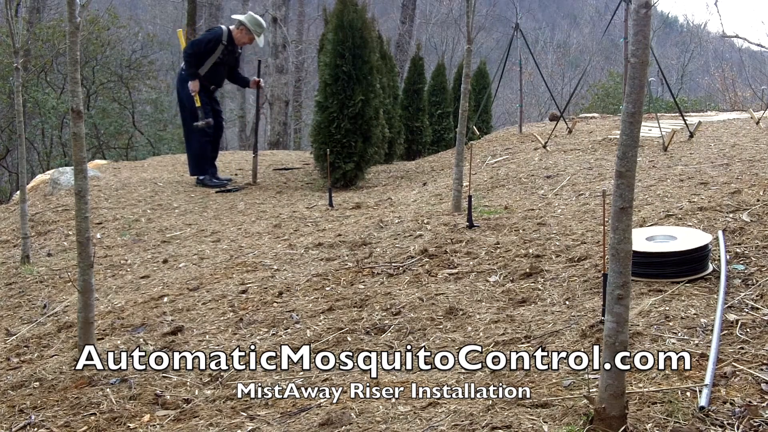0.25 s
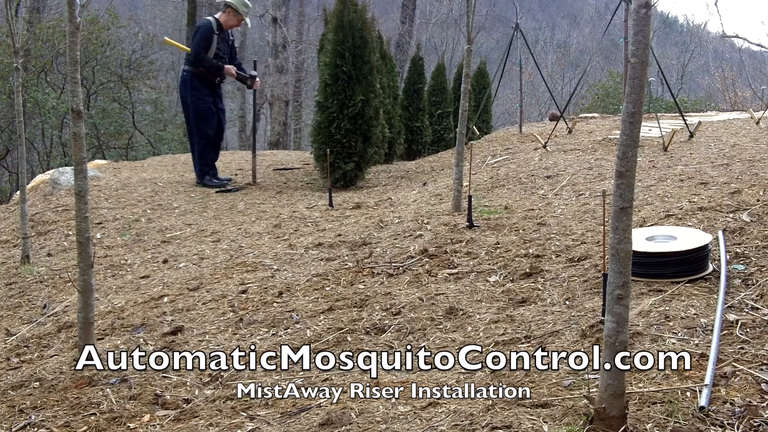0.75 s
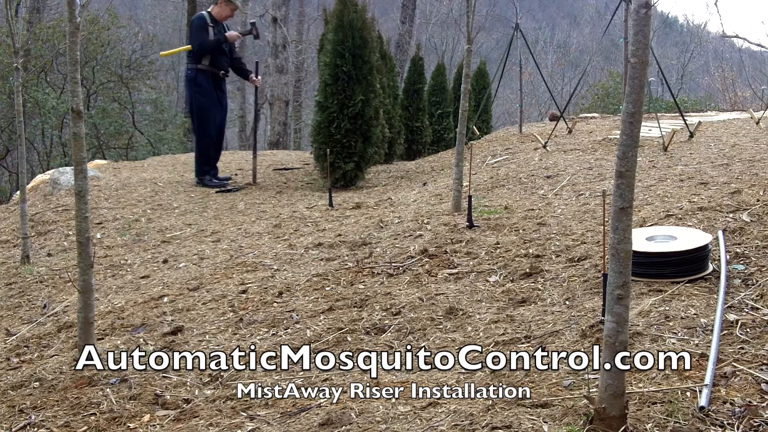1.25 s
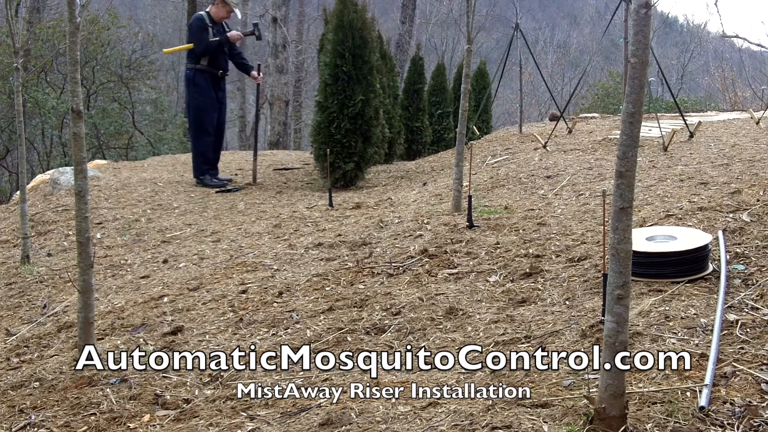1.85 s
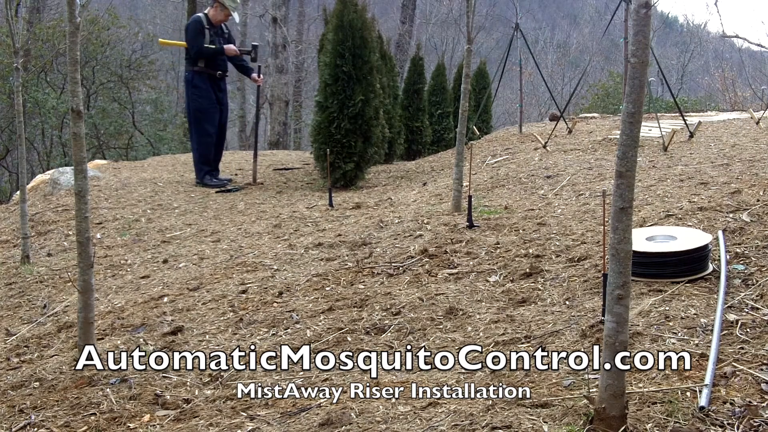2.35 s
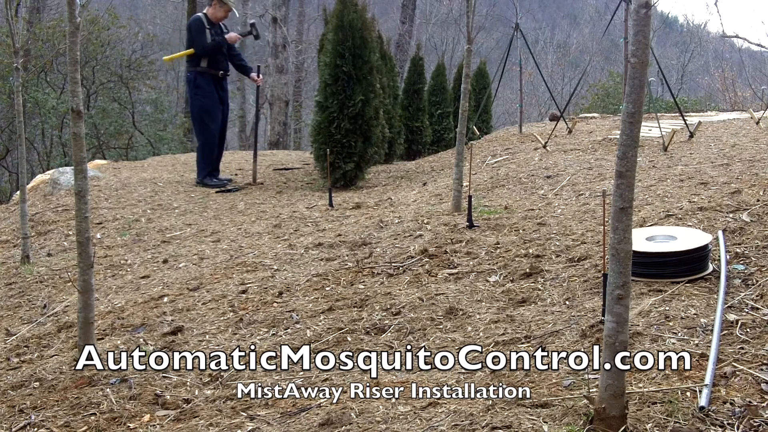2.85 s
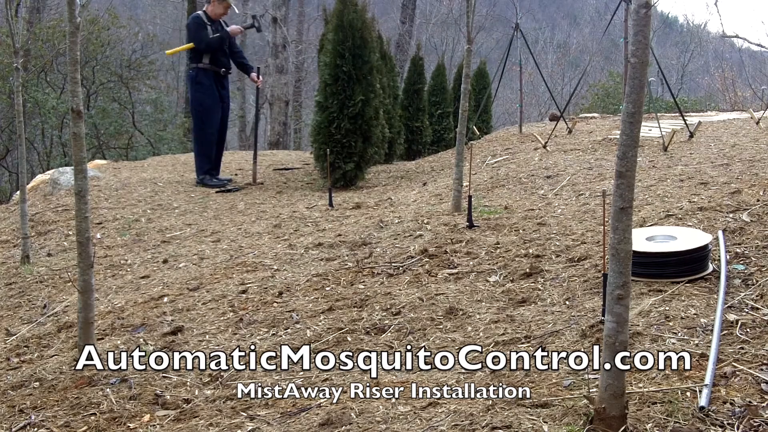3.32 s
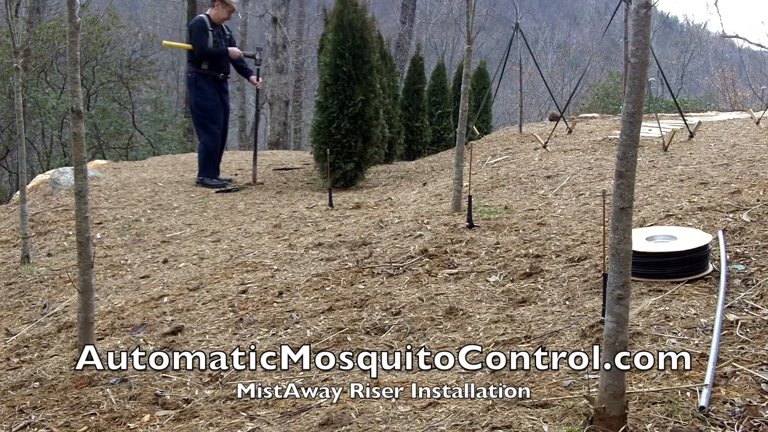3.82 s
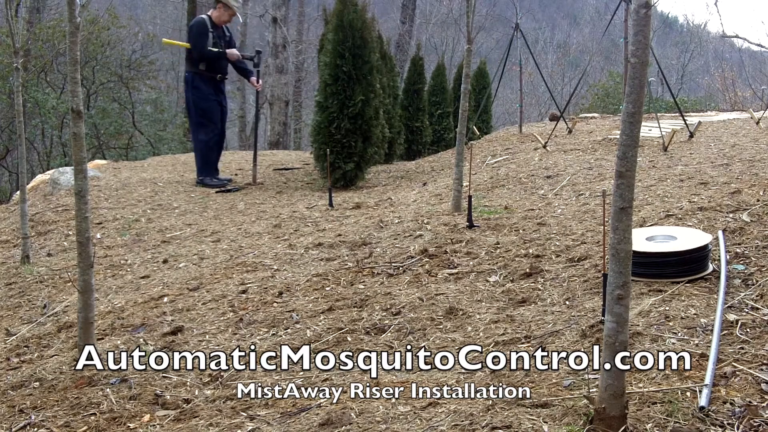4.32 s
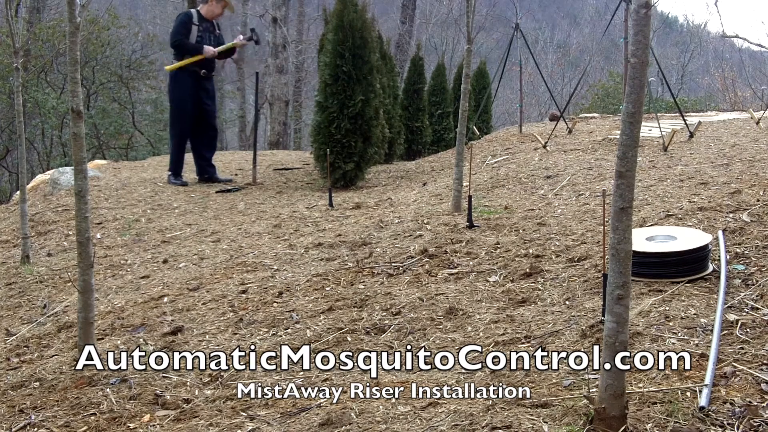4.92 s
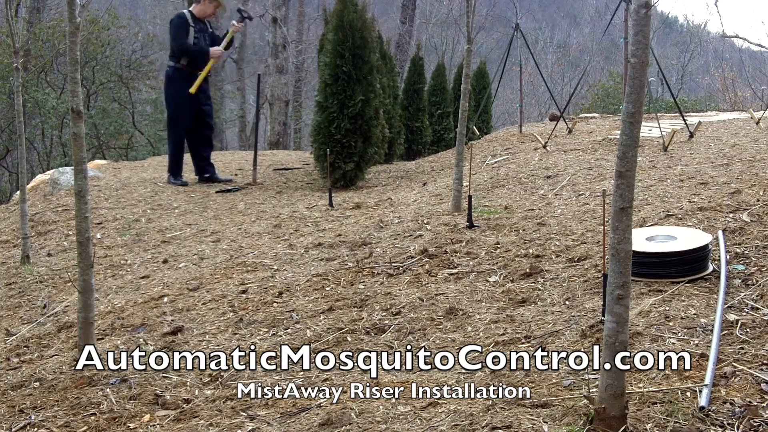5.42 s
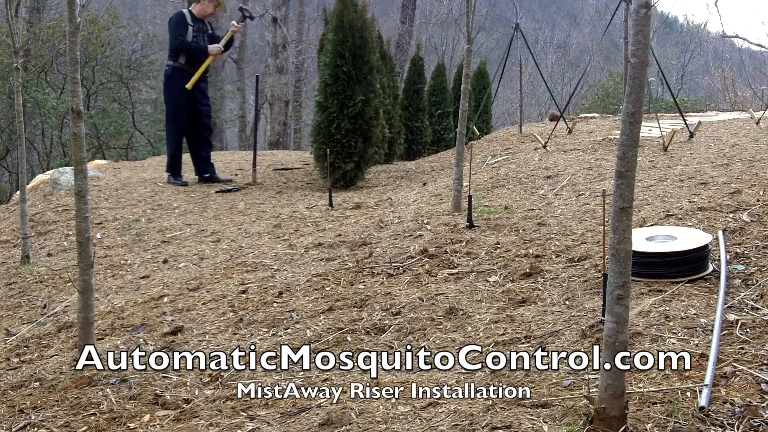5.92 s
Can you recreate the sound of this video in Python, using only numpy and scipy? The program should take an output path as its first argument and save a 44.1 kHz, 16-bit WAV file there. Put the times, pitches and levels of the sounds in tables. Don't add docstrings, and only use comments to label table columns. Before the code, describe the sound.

Outdoors on a wooded hillside, soft wind and faint crows precede four evenly spaced distant sledge blows on a steel stake, each a bright clank with a short ring and an echo from the trees. The scene then cuts abruptly to nearer, drier hammer taps, quick and irregular, with sharp cracks, a high singing hammer head and dull soil thuds. A small bird whistles faintly.

```python
import sys
import numpy as np
from scipy import signal
from scipy.fft import rfft, irfft, next_fast_len
from scipy.io import wavfile
from scipy.ndimage import uniform_filter1d, map_coordinates

SR = 44100
rng = np.random.default_rng(int(sys.argv[2]) if len(sys.argv) > 2 else 0)


def master(y):
    cut = np.clip(np.atleast_2d(y).T, -1, 1)
    pcm = np.round(cut * 32767)
    wavfile.write(sys.argv[1], SR, pcm.astype(np.int16))


def makeup_ratio(level_db):
    decades = np.asarray(level_db, float) / 20
    return 10 ** decades


N = 272097
CHANGE_S = 4.243


def unit(x):
    return x / np.sqrt(np.mean(x ** 2) + 1e-20)


def along(points, hz):
    f, v = np.transpose(points)
    return np.interp(np.log(hz + 1), np.log(f + 1), v)


def curve(rows):
    return np.interp(np.arange(N) / SR, *np.transpose(rows))


def wobble(rate):
    knots = rng.standard_normal(int(N * rate / SR) + 4)
    return map_coordinates(knots, [np.arange(N) * rate / SR])


def filtered(x, response):
    n = x.shape[-1]
    m = next_fast_len(n + 8192)
    return irfft(rfft(x, m) * response(np.fft.rfftfreq(m, 1 / SR)), m)[..., :n]


def rush(spectrum, alike):
    def mid_and_side(hz):
        turn = np.arccos(np.clip(along(alike, hz), -1, 1)) / 2
        colour = makeup_ratio(along(spectrum, hz)) * (hz > spectrum[0][0])
        return colour * [np.cos(turn), np.sin(turn)]

    mid, side = filtered(rng.standard_normal((2, N)), mid_and_side)
    return unit(np.array([mid + side, mid - side]))


def ring(modes, t, scatter_db, gains_db=0):
    hz, db, t60 = np.transpose(modes)[:, :, None]
    level = db + gains_db + scatter_db * rng.standard_normal(hz.shape) - 60 * t / t60
    return np.sum(makeup_ratio(level) * np.sin(2 * np.pi * hz * t), 0)


def causal(spectrum, size=4096):
    hz = np.fft.rfftfreq(size, 1 / SR)
    cepstrum = irfft(np.log(makeup_ratio(along(spectrum, hz))), size)
    cepstrum[1:size // 2] *= 2
    cepstrum[size // 2 + 1:] = 0
    return irfft(np.exp(rfft(cepstrum)), size)[:size // 4]


def burst(spectrum, t, t60, bounces):
    force = rng.standard_normal(len(t)) * makeup_ratio(-60 * t / t60)
    for s, db in bounces:
        force[round(s * SR)] += makeup_ratio(db)
    sound = signal.fftconvolve(force, causal(spectrum))[:len(t)]
    return sound / np.abs(sound).max()


def answer(x, decays, echoes, rise):
    hz, t, z = signal.stft(rng.standard_normal(len(x)), SR, nperseg=256)
    fading = z * makeup_ratio(-60 * t / along(decays, hz)[:, None])
    tail = signal.istft(fading, SR, nperseg=256)[1][:len(x)]
    age = np.arange(len(x)) / SR
    tail = tail * (1 - np.exp(-age / rise))
    tail = tail / np.linalg.norm(tail)
    for s, smear, top_hz, db in echoes:
        clump = rng.standard_normal(len(x)) * np.exp(-((age - s) / smear) ** 2)
        clump = makeup_ratio(db) * clump / np.linalg.norm(clump)
        tail = tail + filtered(clump, lambda f: 1 / (1 + (f / top_hz) ** 2))
    return signal.fftconvolve(x, tail)[:len(x)]


def housing(x):
    return filtered(x, lambda hz: makeup_ratio(-10.5 * np.exp(-((hz - 4250) / 330) ** 2)))


# start in seconds, level in dB, sharpness in dB, grip of the soil in dB.
SLEDGE_BLOWS = [
    (1.746, -20.5, -3, -2.5),
    (2.3992, -19, 2, -3.5),
    (3.106, -19.5, 2, -0.5),
    (3.9381, -19.5, 5.5, 1),
]
STAKE_PITCHES = [130, 330, 672, 1070, 1530, 2095, 2294, 2770, 3450, 4925, 5181, 5700, 6100, 6270, 6580,
                 6960, 7080, 7277, 8000, 9421, 10250, 11965, 13890]
# level in dB, t60 in seconds, level sent sideways into the trees in dB.
STAKE_MODES = [(-22.5, 0.096, -13), (-26.5, 0.075, -7), (-21, 0.05, 5.5), (-10, 0.041, -1.5),
               (-18, 0.066, 4.5), (-8, 0.078, -6.5), (0, 0.12, -10.5), (-12.5, 0.059, -3.5),
               (-10, 0.031, -0.5), (-14, 0.19, -9), (-39, 0.15, -1.5), (-29, 0.075, -3.5),
               (-9.5, 0.055, 2.5), (-30.5, .06, -7), (-30.5, 0.047, -6.5), (-20.5, 0.14, 2.5),
               (-13, 0.097, -1), (-6, 0.073, -10), (-17.5, 0.1, 1), (-9.5, 0.043, -2), (-19, 0.024, 3),
               (-22, 0.043, -5), (-29.5, .07, -5.5)]
# frequency in Hz, level in dB.
CLANK_COLOUR = [(300, -16.5), (520, -17.5), (700, -3.5), (1100, 5), (1800, -4.5), (3000, -1.5),
                (4250, -14.5), (6500, 5.5), (10000, -15.5), (15500, -46)]
# frequency in Hz, t60 in seconds.
WOODS_DECAY = [(300, 0.54), (1000, 1), (2500, 1.0), (5000, 0.82), (9000, 0.28), (14000, 0.3)]


def blows():
    out, t = np.zeros(N + 2 * SR), np.arange(SR) / SR
    pitch = np.array(STAKE_PITCHES)[:, None]
    level, t60, sent_db = np.transpose(STAKE_MODES)
    modes = np.column_stack([pitch, level, t60])
    freed_modes = modes * [1.003, 1, 5]
    onset = 1 - np.exp(-t / 0.00047)

    def beam(hz):
        return makeup_ratio(-5) / (1 + 1j * hz / 4500) ** 2

    for s, db, sharp_db, grip_db in SLEDGE_BLOWS:
        five_db = -3 - grip_db
        seven_db = 0.87 * sharp_db
        gains_db = along([(2100, grip_db), (2290, 0), (2800, 0), (4900, five_db),
                          (6000, seven_db), (7300, seven_db), (9400, sharp_db)], pitch)
        sideways_db = gains_db + sent_db[:, None]
        clank = burst(CLANK_COLOUR, t, t60=0.051, bounces=[(.0003, 14.2), (.004, 4.6)])
        clank = makeup_ratio(grip_db + 5.5) * clank
        direct = onset * ring(modes, t, scatter_db=1, gains_db=gains_db) + clank
        after = ring(freed_modes, t, scatter_db=2, gains_db=sideways_db - 12 * (pitch < 1800))
        sideways = onset * ring(modes, t, scatter_db=1, gains_db=sideways_db) + filtered(clank, beam)
        trees = housing(answer(sideways, WOODS_DECAY, [(.046, 0.0075, 2580, 4.4)], rise=0.0032))
        blow = direct + makeup_ratio(-24 - grip_db) * after + makeup_ratio(-8.0) * trees
        out[round(s * SR):][:len(t)] += makeup_ratio(db) * blow
    return out[:N]


# start in seconds, peak in dB, hardness in dB, rebound in dB.
HAMMER_TAPS = [
    (4.191, -19, -3, -14),
    (4.3719, -15.5, -1.5, -10),
    (4.5696, -15, 0.5, -11.5),
    (4.9424, -16, 0, -32),
    (5.1009, -14.5, 2.5, -15),
    (5.269, -14, 5.5, -31),
    (5.595, -13, 8, -26),
    (5.869, -13.5, 6.5, -19),
    (6.088, -13, 11.5, -17),
]
# start in seconds, peak in dB.
FACE_GRAZES = [
    (5.0765, -43),
    (5.2533, -43),
    (5.5823, -43),
    (6.0812, -41.5),
]
HEAD_PITCHES = [9221, 9160, 9240, 14000]
# level in dB, t60 in seconds.
HEAD_MODES = [(1, 0.0087), (-0.5, 0.024), (-35, 0.47), (-37, 0.04)]
FACE_PITCHES = [4225, 4330]
# level in dB, t60 in seconds.
FACE_MODES = [(-30.5, 0.067), (-41.5, 0.085)]
# frequency in Hz, level in dB, t60 in seconds.
SOIL_MODES = [(183.4, -27.5, 0.25), (211.4, -9.5, 0.058), (349, -8, 0.018), (494, -12.5, 0.015)]
# frequency in Hz, level in dB.
CRACK_COLOUR = [(300, -34), (1000, -3.5), (1900, -10.5), (2600, 4.5), (4600, 10), (5700, 8), (7000, -5),
                (10500, 0), (13000, 4.5), (16500, -17.5)]
# frequency in Hz, t60 in seconds.
BANK_DECAY = [(200, 0.42), (2000, 0.27), (5000, 0.26), (9000, 0.23), (14000, 0.15)]


def taps():
    out, t = np.zeros(N + SR), np.arange(SR // 2) / SR
    late = np.clip(t - .0012, 0, 1)
    head_modes = np.column_stack([HEAD_PITCHES, HEAD_MODES])
    face_modes = np.column_stack([FACE_PITCHES, FACE_MODES])
    thud_db, head_level_db = -25, -6.5
    contacts = [(*tap, thud_db, head_level_db) for tap in HAMMER_TAPS]
    contacts += [(*graze, -6.5, -20, thud_db - 23, head_level_db - 7.5) for graze in FACE_GRAZES]
    for s, db, hard_db, rebound_db, soil_db, head_db in contacts:
        head = makeup_ratio(head_db - 0.74 * hard_db) * ring(head_modes, t, scatter_db=1)
        head = head * (1 - np.exp(-t / 0.00013))
        face = makeup_ratio(-2 * hard_db) * ring(face_modes, t, scatter_db=1)
        colour = [(hz, gain + hard_db * (hz < 3000 or hz > 6500)) for hz, gain in CRACK_COLOUR]
        bounces = [(.0001, 13), (.00054, 24), (.0012, 24 + rebound_db)]
        click = burst(colour, t, t60=.007, bounces=bounces)
        deeper_db = 5.5 * (s - CHANGE_S)
        thud = -makeup_ratio(soil_db + deeper_db) * ring(SOIL_MODES, late, scatter_db=1)
        thud = thud * (1 - np.exp(-late / .001))
        bank = answer(click + face + makeup_ratio(-4.0) * head, BANK_DECAY, [(.011, 0.0011, 8960, 0)], rise=0.0013)
        out[round(s * SR):][:len(t)] += makeup_ratio(db) * (click + head + face + makeup_ratio(-11) * bank) + thud
    return out[:N]


# start in seconds, frequency in Hz, level in dB, t60 in seconds.
GROUND_THUMPS = [
    (2.405, 38, -35, 0.18),
    (3.111, 42.4, -39, 0.33),
    (3.942, 49, -37, 0.29),
]


def thumps():
    out, t = np.zeros(N + SR), np.arange(SR // 2) / SR
    for s, hz, db, t60 in GROUND_THUMPS:
        wave = ring([(hz, db, t60)], t, scatter_db=5.5)
        out[round(s * SR):][:len(t)] += wave * (1 - np.exp(-t / 0.012))
    return out[:N] * makeup_ratio([[1.8], [-1.8]])


# start in seconds, length in seconds, start pitch in Hz, end pitch in Hz, level in dB.
CROW_CAWS = [
    (0.096, 0.15, 1420, 1520, -70),
    (0.31, 0.14, 1300, 1344, -71),
    (0.491, 0.19, 1460, 1370, -71),
    (0.681, 0.17, 1260, 1275, -69.5),
    (.74, 0.18, 1470, 1453, -71.5),
    (0.899, 0.273, 1450, 1410, -75),
    (1.398, 0.34, 1420, 1420, -75),
    (1.41, 0.12, 1300, 1345, -71),
]


def crows():
    out = np.zeros(N + SR)
    for s, length, start_hz, end_hz, db in CROW_CAWS:
        u = np.arange(round(length * SR)) / (length * SR)
        hoarse = unit(uniform_filter1d(rng.standard_normal(len(u)), size=500)) + 0.18
        hz = start_hz + (end_hz - start_hz) * u
        caw = hoarse * np.sin(2 * np.pi * np.cumsum(hz) / SR)
        out[round(s * SR):][:len(u)] += makeup_ratio(db) * caw * np.sin(np.pi * u) ** 0.22
    return out[:N]


# start in seconds, top level in dB.
BIRD_NOTES = [
    (4.667, -63),
    (4.748, -66),
    (4.808, -66),
    (5.993, -66),
    (6.022, -69),
    (6.046, -76),
]


def songbird():
    note_s = 0.0245
    out, u = np.zeros(N + SR), np.arange(round(note_s * SR)) / (note_s * SR)
    blur_hz = 60 * wobble(400)
    for s, db in BIRD_NOTES:
        hz = 5000 + 450 * np.sin(np.pi * u) - 350 * u ** 2
        hz = hz + blur_hz[round(s * SR):][:len(u)]
        whistle = np.sin(2 * np.pi * np.cumsum(hz) / SR)
        out[round(s * SR):][:len(u)] += makeup_ratio(db) * whistle * np.sin(np.pi * u)
    return out[:N] * makeup_ratio(2 * wobble(90))


# start in seconds, length in seconds, centre in Hz,
# width in Hz, level in dB.
LEAF_RUSTLES = [
    (0.334, 0.071, 6200, 1200, -70.5),
    (0.465, 0.037, 4840, 330, -77),
    (0.805, 0.024, 5370, 980, -75),
    (0.83, 0.065, 6050, 710, -69.5),
    (1.314, 0.11, 6500, 1500, -75),
    (1.574, 0.086, 7160, 80, -97),
    (4.656, 0.26, 5166, 400, -78),
    (5.022, 0.0089, 11570, 3000, -66),
    (4.216, 0.31, 408, 8.6, -63.5),
    (4.3, 1, 176, 14, -63),
]


def rustles():
    out = np.zeros(N + SR)
    for s, length, hz, width, db in LEAF_RUSTLES:
        noise = rng.standard_normal(round(length * SR))
        noise = filtered(noise, lambda f: np.exp(-((f - hz) / width) ** 2))
        out[round(s * SR):][:len(noise)] += makeup_ratio(db) * unit(noise) * np.hanning(len(noise))
    return out[:N]


# time in seconds, buffet level in dB.
WIND_BUFFETS = [(0.05, -59), (0.55, -61), (1.11, -56), (2.19, -60), (3.3, -54.5), (3.69, -61),
                (4.08, -56.5), (4.36, -60.5), (5.0, -67), (5.22, -68.5), (5.88, -65), (6.1, -75)]
# frequency in Hz, level in dB per Hz.
WIND_COLOUR = [(3, -10), (10, 17), (25, 23.5), (45, 20), (70, 22), (110, -33.5)]


def low_wind():
    return makeup_ratio(curve(WIND_BUFFETS) + 2 + [[.8], [-.8]]) * rush(WIND_COLOUR, [(30, 1.0)])


# frequency in Hz, level in dB per Hz.
FAR_AIR_COLOUR = [(41, -35), (70, -7), (108, -1.5), (131, -12), (186, -9), (269, -15.5), (550, -17),
                  (587, -17.5), (1080, -26.5), (1430, -25.5), (1660, -30), (2350, -34), (4130, -43.5),
                  (6380, -37), (12500, -39), (16200, -68.5), (22000, -120)]
# frequency in Hz, left-right likeness from 0 to 1.
FAR_AIR_LIKENESS = [(60, 0.95), (130, 1), (290, 0.98), (640, 0.99), (1410, 0.92), (3100, 0.81),
                    (6820, 0.85), (15000, 0.23)]


def far_air():
    return housing(makeup_ratio(-59.5 + 0.2 * wobble(5.38)) * rush(FAR_AIR_COLOUR, FAR_AIR_LIKENESS))


# frequency in Hz, level in dB per Hz.
NEAR_AIR_COLOUR = [(41, -52), (70, -3.5), (167, 0.5), (320, -6), (472, -12), (698, -12), (867, -17.5),
                   (1050, -18.5), (1430, -21), (2400, -22.5), (3550, -28.5), (5360, -31.5), (6660, -34.5),
                   (9430, -38), (12500, -43), (16200, -101), (22000, -120)]
# frequency in Hz, left-right likeness from 0 to 1.
NEAR_AIR_LIKENESS = [(60, 1), (130, 0.98), (290, 0.97), (640, 0.97), (1410, 0.98), (3100, 0.97),
                     (6820, 0.91), (15000, 0.85)]


def near_air():
    return makeup_ratio(-54.5 + 0.69 * wobble(15)) * rush(NEAR_AIR_COLOUR, NEAR_AIR_LIKENESS)


# time in seconds, level in dB.
HUM_LEVELS = [(0, -62.5), (1.5, -58.5), (2, -75.5), (4.2, -66)]


def far_hum():
    phase = 2 * np.pi * 102 * np.arange(N) / SR + 1.2 * wobble(7.4)
    return makeup_ratio(curve(HUM_LEVELS) + 2.2 * wobble(27)) * np.sin(phase)


# frequency in Hz, level in dB rms.
MOTOR_LINES = [(4764, -97), (6621, -89), (7165, -87), (7375, -96), (7865, -90), (8452, -91), (8484, -93)]


def camera_whine():
    out, t = np.zeros(N), np.arange(N) / SR
    for hz, db in MOTOR_LINES:
        strength = makeup_ratio(db + 3 + 2.5 * wobble(30))
        out += strength * np.sin(2 * np.pi * hz * t + .7 * wobble(20))
    return out


# frequency in Hz, level in dB per Hz.
HISS_COLOUR = [(11500, -30), (12800, 0), (14500, -2), (15300, -5)]


def preamp_hiss():
    return makeup_ratio(-86) * rush(HISS_COLOUR, [(13000, .5)])


def scene():
    near = np.clip((np.arange(N) / SR - CHANGE_S) / .01, 0, 1)
    far_scene = blows() + camera_whine() + far_hum() + preamp_hiss() + far_air()
    near_scene = taps() + near_air()
    places = np.sqrt(1 - near) * far_scene + np.sqrt(near) * near_scene
    return places + thumps() + crows() + songbird() + rustles() + low_wind()


def band_limit(x):
    return signal.sosfilt(signal.butter(12, 16820, fs=SR, output="sos"), x)


CONVERTER_OFFSET = [
    [.0323],
    [.0127],
]


def record(dry):
    quiet_hz, air_hz, loud_hz = 12800, 15200, 16600
    hz, t, z = signal.stft(dry, SR, nperseg=512)
    treble = np.sum(np.abs(z[0, (hz > 2000) & (hz < quiet_hz)]) ** 2, 0)
    treble = uniform_filter1d(treble, size=5)
    lucky = uniform_filter1d(rng.standard_normal(z.shape[1:]), size=6, axis=0) > .9
    edge_hz = np.where((treble > makeup_ratio(-132)) | (t > CHANGE_S), air_hz, quiet_hz)
    edge_hz = np.where(treble > makeup_ratio(-86), loud_hz, edge_hz)
    keep = (hz[:, None] < edge_hz) | lucky & (hz[:, None] < air_hz)
    gated = signal.istft(z * keep, SR, nperseg=512)[1][:, :N]
    return band_limit(gated + CONVERTER_OFFSET)


dry = scene()
out = record(dry)
master(out)
```